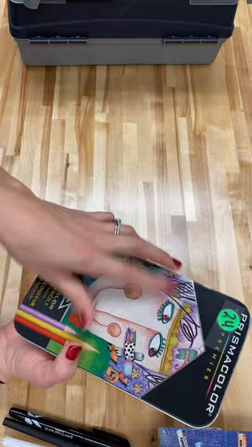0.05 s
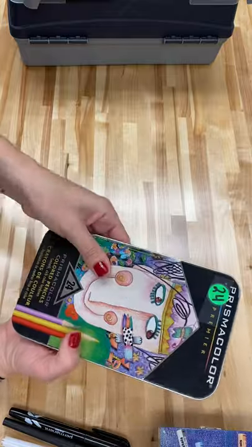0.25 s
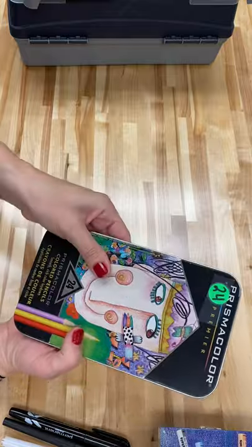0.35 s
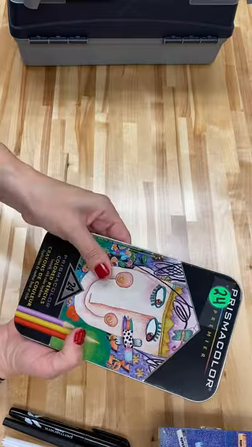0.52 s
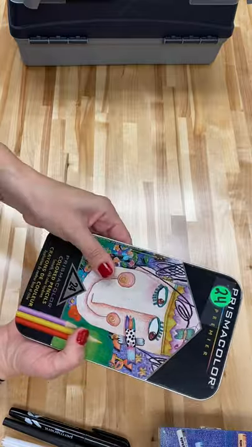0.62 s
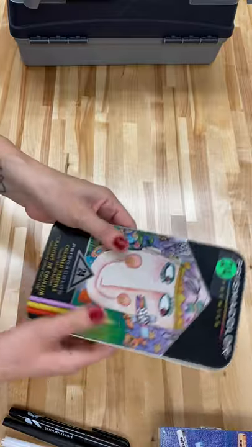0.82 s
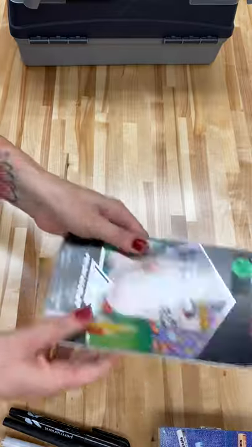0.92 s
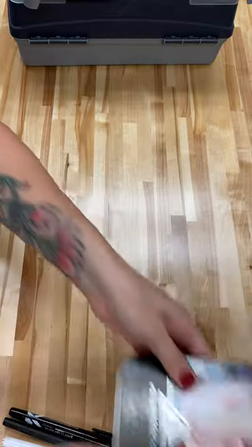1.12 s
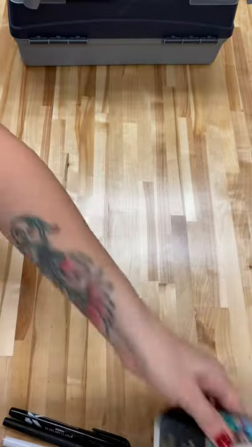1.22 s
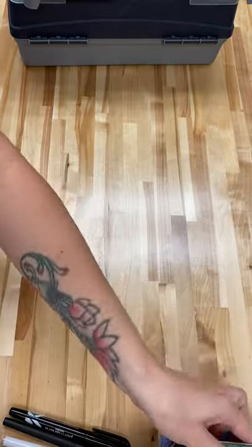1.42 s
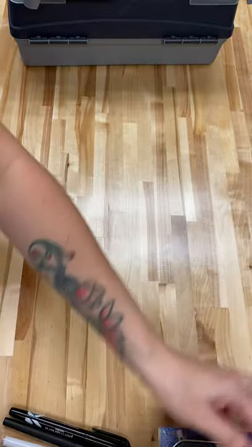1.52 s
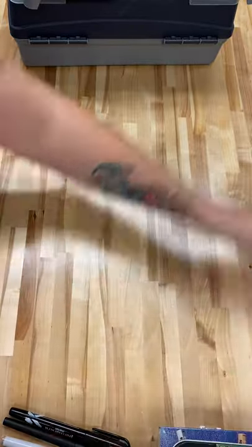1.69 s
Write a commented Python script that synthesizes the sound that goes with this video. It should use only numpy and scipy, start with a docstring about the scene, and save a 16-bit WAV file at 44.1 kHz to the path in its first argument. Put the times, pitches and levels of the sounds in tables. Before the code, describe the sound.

A metal tin's lid is tapped by fingernails, then snaps shut with two loud, ringing clacks. Hands slide faintly over it and set it on a wooden table, close to the microphone in a quiet room.

```python
"""Metal tin on a wooden table

Close up in a quiet room, on a microphone with two ports. Fingers and nails tap the lid of a flat
tin, which snaps shut with two loud clacks; hands slide over it, turn it and set it on the table.
Each blow is an impact, a clatter and a ring; sliding is grainy noise. A low hum lies under it all."""
import sys
import numpy as np
from scipy import signal
from scipy.fft import rfft, irfft, next_fast_len
from scipy.io import wavfile
from scipy.ndimage import uniform_filter1d

SR = 44100
rng = np.random.default_rng(int(sys.argv[2]) if len(sys.argv) > 2 else 0)


def waveform_to_disk(signal):
    """Save audio, clipped to [-1, 1], as 16-bit WAV at the path in sys.argv[1]."""
    frames = np.transpose(np.atleast_2d(signal))
    scaled = np.clip(frames, -1, 1) * 32767
    samples = np.round(scaled).astype(np.int16)
    wavfile.write(sys.argv[1], SR, samples)


N = 77175


def lid_taps():
    """Fingers and nails strike the lid and set it ringing."""
    # taps (time [s], thud [dB], clack [dB], tick [dB], sparkle [dB], ring [dB], contact [s])
    taps = [(.018, -66, -49.5, -93, -59.5, -61, .002), (.1085, -50, -37.5, -47.5, -49.5, -57.5, 0.0027),
            (.2142, -30.5, -27, -27, -34, -29, .002), (.2235, -33.5, -33.5, -43, -52, -30, .002),
            (.2412, -42.5, -25.5, -40.5, -26.5, -36.5, 0.002), (.2828, -31, -38, -50.5, -46, -43.5, 0.0018),
            (.9098, -48, -54, -57, -66, -63, .003), (.9405, -62.5, -40.5, -52, -95, -45, .004)]
    colour = [(80, -14.5), (280, 6.5), (520, 5), (1000, -2.5), (1600, -2.5), (2300, -15), (3200, -8.5),
              (4500, -15), (5600, -11), (8500, -13.5), (12000, -14), (15000, -34.5)]  # spectrum of a tap (frequency [Hz], density [dB])
    lid_modes = [(242, -7.5, .17), (350, -6, 0.03), (499.1, 5, 0.11), (611.5, 4, 0.03), (1315, -11, 0.11),
                 (1394, -9.5, .08), (1605, -9.5, .09), (1980, -10.5, 0.12), (2820, -10, .1),
                 (3275, -10.5, 0.069)]  # (frequency [Hz], level [dB], t60 [s])
    return blows(taps, colour, lid_modes, damping_scale=0.99, impact_share=0.17)


def lid_snaps():
    """The lid snaps over the rim in two clacks, and the whole tin rings."""
    # snaps (time [s], thud [dB], clack [dB], tick [dB], sparkle [dB], ring [dB], contact [s])
    snaps = [(.3434, -28, -16.5, -15, -16.5, -12.5, 0.0045), (.3683, -12, -10.5, -7, -3.5, -4.5, 0.0028)]
    colour = [(60, -14.5), (180, -9.5), (300, 1), (490, 6.5), (700, 0.5), (860, 6), (1100, 0), (1480, 0.5),
              (1660, -7), (1920, 3.5), (2200, -12.5), (2480, -1.5), (3500, -10.5), (4700, -11), (6300, -5),
              (7700, -10.5), (10700, -13.5), (15000, -35.5)]  # spectrum of a snap (frequency [Hz], density [dB])
    tin_modes = [(200, -4.5, 0.055), (508.3, -3.5, 0.16), (822, 3.5, .05), (1490, -4, 0.025),
                 (1521, -0.5, .05), (1865, -4, .035), (1936, 4, .042), (1976, -17, 0.13),
                 (5290, -10.5, .045), (6265, -2, 0.056)]  # (frequency [Hz], level [dB], t60 [s])
    return blows(snaps, colour, tin_modes, damping_scale=0.95, impact_share=0.36)


def table_knocks():
    """The tin meets the table: the clatter dies fast and the wood rings."""
    # knocks (time [s], thud [dB], clack [dB], tick [dB], sparkle [dB], ring [dB], contact [s])
    knocks = [(1.3396, -28.5, -24.5, -31, -35, -53, 0.0011), (1.351, -36, -35.5, -46, -40.5, -70, 0.0033),
              (1.3948, -38.5, -38.5, -52, -50, -49.5, 0.0022),
              (1.4305, -62, -26.5, -37.5, -32, -42, 0.0011), (1.434, -18, -40, -39, -33, -33, 0.00095),
              (1.4415, -40.5, -45, -45, -53, -52, 0.006)]
    colour = [(80, -17), (220, 5), (500, 3.5), (950, 6.5), (1500, -14), (2300, -4.5), (3500, -15),
              (4800, -12.5), (6200, -18), (8000, -18), (11000, -19), (15000, -57)]  # spectrum of a knock (frequency [Hz], density [dB])
    table_modes = [(209, 7, 0.054), (245, 9.5, 0.039), (368, -2.5, 0.058), (510, -0.5, 0.14),
                   (861.6, -13, 0.16), (1031, 7.5, 0.088)]  # (frequency [Hz], level [dB], t60 [s])
    return blows(knocks, colour, table_modes, damping_scale=0.24, impact_share=0.15)


def blows(rows, colour, modes, damping_scale, impact_share):
    """Each blow is a sharp impact and a short clatter of dense modes over a few strong ones."""
    damping = [(100, 0.078), (450, 0.052), (1000, 0.026), (2000, 0.078), (5000, 0.05), (12000, 0.0088)]  # decay of the clatter (frequency [Hz], t60 before damping_scale [s])
    attack_s, bass_attack_cycles = 0.00053, 0.52
    graze_s = 0.00056  # the surfaces graze just before they meet fully
    out, t = np.zeros(N), np.arange(SR // 10) / SR
    tones = .5 * ring(modes, np.arange(SR // 4) / SR)
    for start, *levels_db, ring_db, contact_s in rows:
        hz, width, bands = noise_bands(len(t), count=48)
        rise = 1 - np.exp(-(t / (attack_s + bass_attack_cycles / hz)) ** 2)
        shape = rise * fade(np.maximum(t - contact_s, 0), read(damping, hz) * damping_scale)
        gains = band_gains(hz, width, colour, levels_db) * np.sqrt(np.mean(shape ** 2, 1, keepdims=True))
        clatter = (evened(bands * shape) * gains).sum(0)
        pulse = np.linalg.norm(clatter) * impact(hz[:, 0], (gains / np.sqrt(width))[:, 0])
        add(out, start, np.sqrt(1 - impact_share) * clatter)
        add(out, start + graze_s, np.sqrt(impact_share) * pulse)
        add(out, start, amp(ring_db) * tones)
    return out


def impact(hz, density, size=2048):
    """One sharp minimum-phase pulse of energy 1 with the given spectrum."""
    log_gain = np.interp(abs(np.fft.fftfreq(size, 1 / SR)), hz, np.log(density + 1e-9))
    pulse = np.fft.ifft(np.exp(np.conj(signal.hilbert(log_gain)))).real
    return pulse / np.linalg.norm(pulse)


def ring(modes, t, rise_s=0.00036, low_cut_hz=110):
    """Dying sines started by one push; little sounds below the low cut."""
    tones = sum(amp(db) * fade(t, t60) * np.sin(2 * np.pi * hz * t) for hz, db, t60 in modes)
    rise = 1 - np.exp(-t / rise_s)
    return signal.lfilter(*signal.butter(2, low_cut_hz, "high", fs=SR), tones * rise)


def rubs(grain_db=3.0, grain_s=0.0015):
    """Skin slides on tin: grainy friction that swells and fades with each move of the hands."""
    # hand moves (peak time [s], rise [s], fall [s], low [dB], middle [dB], high [dB])
    moves = [(.004, 0.0067, 0.053, -59, -64.5, -76), (0.086, 0.003, 0.07, -54, -61, -75),
             (0.215, 0.0086, 0.021, -42.5, -44.5, -57), (0.339, 0.011, 0.0081, -38, -51.5, -60),
             (0.918, 0.02, 0.065, -61, -57.5, -71), (0.945, 0.024, 0.021, -49, -50, -65),
             (1.015, 0.011, 0.0184, -54, -58, -78.5), (1.108, 0.027, 0.079, -66.5, -69.5, -82.5),
             (1.319, 0.032, 0.066, -53.5, -53.5, -66.5), (1.369, 0.0074, 0.015, -44, -47.5, -50.5),
             (1.477, 0.057, 0.019, -48, -59.5, -68)]
    colour = [(80, -12), (250, -5), (500, 1.5), (1100, -5.5), (1550, -1.5), (2300, -2.5), (3500, -8.5),
              (5000, -6.5), (6300, -5.5), (9000, -11), (12000, -21.5), (15000, -34.5)]  # spectrum of the friction (frequency [Hz], density [dB])
    t = np.arange(N) / SR
    hz, width, bands = noise_bands(N)
    grain = evened(amp(grain_db * noise(lambda f: np.exp(-(f * grain_s) ** 2))))
    swells = np.array([np.exp(np.where(t < peak, -((t - peak) / rise) ** 2, (peak - t) / fall))
                       for peak, rise, fall, *_ in moves])
    gains = np.hstack([band_gains(hz, width, colour, move[3:]) for move in moves])
    return grain * (np.sqrt(gains ** 2 @ swells ** 2) * bands).sum(0)


def skims():
    """Nails and fingertips skim the metal, the rim skims the table: brief hisses, one resonance each."""
    # light touches (peak time [s], half length [s], level [dB], resonance [Hz], half width [Hz])
    touches = [(0.282, 0.0028, -35, 1965, 150), (.838, 0.029, -74.5, 10600, 3530),
               (0.861, 0.036, -68, 1900, 1007), (.961, .003, -54.5, 4970, 1700),
               (1.105, 0.0048, -60, 980, 150), (1.27, 0.014, -81, 11500, 2500),
               (1.375, 0.0022, -57, 6450, 350), (1.418, 0.0016, -56, 7500, 2000),
               (1.4305, 0.001, -39.5, 6040, 350), (1.443, 0.0054, -34, 970, 200)]
    t, out = np.arange(N) / SR, np.zeros(N)
    for peak, half_length, db, hz, half_width in touches:
        out += amp(db) * np.exp(-((t - peak) / half_length) ** 2) * resonant_noise(hz, half_width)
    return out


def room(x, turn_hz=70, count=3):
    """Quick reflections, then the room's tail; each moment takes other paths, so it stays diffuse."""
    reverb = [(115, -21, .45), (175, -12.5, 1), (240, -21.5, 0.44), (480, -22, .52), (720, -19.5, 0.46),
              (1100, -22, 0.35), (1950, -25.5, 0.53), (3260, -18, 0.42), (6900, -26, .42),
              (10000, -20, 0.25), (14000, -36.5, 0.18)]  # the room's tail (frequency [Hz], level [dB], t60 [s])
    build_s, early_db, early_t60 = 0.013, -22, 0.045
    t, out = np.arange(SR // 2) / SR, np.zeros(N)
    paths = [noise_bands(len(t)) for _ in range(count)]
    hz, width, _ = paths[0]
    build = 1 - np.exp(-t / build_s)
    tail = evened(build * fade(t, read(reverb, hz, column=2))) * amp(read(reverb, hz))
    early = evened(t * fade(t, early_t60)) * amp(early_db)
    decay = np.sqrt((tail ** 2 + early ** 2) * 2 * width / (SR * len(t)))
    for k, (_, _, bands) in enumerate(paths):
        window = np.cos(np.pi * (2 * turn_hz * np.arange(N) / SR + k / count)) * np.sqrt(2 / count)
        out += signal.fftconvolve(x * window, (bands * decay).sum(0))[:N]
    return out


def hum(hz=59, rumble_db=-10):
    """A low hum inside a narrow rumble; the two swell and sag together."""
    swells = [(0, -53.5), (.14, -54), (.5, -54), (.74, -57.5), (.9, -57), (.98, -50.5), (1.08, -63),
              (1.15, -50), (1.25, -64.5), (1.35, -49.5), (1.48, -66), (1.52, -48), (1.68, -53.5),
              (1.75, -61.5)]  # (time [s], level [dB])
    t = np.arange(N) / SR
    tone = np.sqrt(2) * np.sin(2 * np.pi * hz * t)
    rumble = amp(rumble_db) * resonant_noise(hz, half_width_hz=24)
    return amp(np.interp(t, *np.transpose(swells))) * (tone + rumble)


def air(level_db=-61.5):
    """Room tone: the faint steady noise of still air."""
    colour = [(30, -8), (85, 3), (118, -3), (160, -9.5), (250, -19), (500, -19.5), (800, -34),
              (1150, -41.5), (1480, -21.5), (1900, -40.5), (3000, -45), (6000, -43), (10000, -45),
              (14000, -56)]  # spectrum of the room tone (frequency [Hz], density [dB])
    return amp(level_db) * noise(lambda f: amp(read(colour, f)))


def ports(sound, unrelated, likeness):
    """Both microphone ports hear the sound; the right one blends in an unrelated signal."""
    lag = [(20, 0), (150, -.1), (300, -.3), (600, -.55), (1250, -.42), (2100, .3), (2800, 1.4), (3400, .5),
           (4480, 1.3), (5050, 5.2), (5700, 6.9), (8500, 8), (11000, 9), (13500, 9.3)]  # right port behind left (frequency [Hz], phase [rad])
    balance = [(200, -2), (480, 3.5), (850, 4.5), (1400, 0), (2200, 0), (3000, -1.5), (4300, -0.5),
               (6000, 0), (12000, -0.5)]  # left port over right (frequency [Hz], level [dB])
    blend = shaped(sound, lambda f: read(likeness, f))
    blend += shaped(unrelated, lambda f: np.sqrt(1 - read(likeness, f) ** 2))
    left = shaped(sound, lambda f: amp(read(balance, f) / 2))
    right = shaped(blend, lambda f: amp(-read(balance, f) / 2) * np.exp(-1j * read(lag, f)))
    return np.array([left, right])


def scattered(x, size=192):
    """The same sound smeared over a few milliseconds."""
    return signal.fftconvolve(x, irfft(np.exp(2j * np.pi * rng.random(size // 2 + 1))))[:N]


def amp(db):
    """Decibels to gain."""
    return 10 ** (np.asarray(db) / 20)


def fade(t, t60):
    """A decay that loses 60 dB in t60 seconds."""
    return np.exp(-np.log(1000) * t / t60)


def evened(x):
    """Scales to rms 1."""
    return x / np.sqrt(np.mean(x ** 2, -1, keepdims=True) + 1e-30)


def read(points, hz, column=1):
    """Reads a column of a table along log frequency."""
    table = np.array(points, float)
    return np.interp(np.log(hz + 1), np.log(table[:, 0] + 1), table[:, column])


def add(mix, start_s, sound):
    """Mixes a sound in at a time."""
    part = mix[round(start_s * SR):][:len(sound)]
    part += sound[:len(part)]


def shaped(x, gain):
    """Filters by a gain that is a function of frequency."""
    n = next_fast_len(2 * x.shape[-1])
    return irfft(rfft(x, n) * gain(np.fft.rfftfreq(n, 1 / SR)), n)[..., :x.shape[-1]]


def noise(gain):
    """Filtered noise of rms 1."""
    return evened(shaped(rng.standard_normal(N), gain))


def resonant_noise(hz, half_width_hz):
    """Noise of rms 1 around one resonance."""
    return noise(lambda f: 1 / (1 + ((f - hz) / half_width_hz) ** 2))


def noise_bands(n, count=26):
    """Noise split in adjoining bands: centres [Hz], widths [Hz] and signals of rms 1."""
    centres = np.geomspace(360, 16300, count) - 300
    hz = np.fft.rfftfreq(n, 1 / SR)
    spectrum = np.exp(2j * np.pi * rng.random(n // 2 + 1)) * (hz > 0)
    bands = np.array([irfft(spectrum * np.interp(hz, centres, row), n) for row in np.eye(count)])
    return centres[:, None], np.gradient(centres)[:, None], evened(bands)


def band_gains(hz, width, colour, levels_db):
    """An object's colour, weighted by one event's levels from bass to treble."""
    band_hz = [400, 2000, 5800, 10000]  # where those levels apply (frequency [Hz])
    return amp(read(colour, hz) + read(list(zip(band_hz, levels_db)), hz)) * np.sqrt(width / 1000)


def scene():
    """The tin close to the microphone, the room around it, the hum in the centre."""
    # how alike the ports hear direct sound and room (frequency [Hz], likeness [0-1])
    direct_likeness = [(2300, 0.92), (3200, .3), (4600, 0.89), (5600, 0.65), (12000, 0.6)]
    room_likeness = [(1200, 0.96), (1800, 0.14), (3000, 0.29), (4300, 0.34), (6200, 0.9), (10000, 0.26)]
    tin = lid_taps() + lid_snaps() + table_knocks() + rubs() + skims()
    direct = ports(tin, scattered(tin), direct_likeness)
    ambience = ports(room(tin) + air(), room(tin) + air(), room_likeness)
    return direct + ambience + hum()


def record(dry):
    """The recorder's gain dips on the snaps and recovers; peaks round off; the top treble is cut."""
    limit_db, limit_share, recover_db_per_s = -13.5, 0.96, 56.5
    ceiling, edge_hz = .95, 13900
    power_db = 10 * np.log10(abs(uniform_filter1d((dry ** 2).mean(0), size=256)) + 1e-12)
    recovery_db = np.arange(N) * recover_db_per_s / SR
    held_db = np.maximum.accumulate(power_db + recovery_db) - recovery_db
    over_db = np.maximum(held_db - limit_db, 0)
    ducked = dry * amp(-limit_share * signal.lfilter(np.ones(400) / 400, 1, over_db))  # 9 ms attack
    rounded = ducked / (1 + (ducked / ceiling) ** 4) ** .25
    low_pass = signal.firwin(511, edge_hz, window=("kaiser", 9), fs=SR)
    return signal.oaconvolve(rounded, low_pass[None], "same")


dry = scene()
out = record(dry)
waveform_to_disk(out)
```